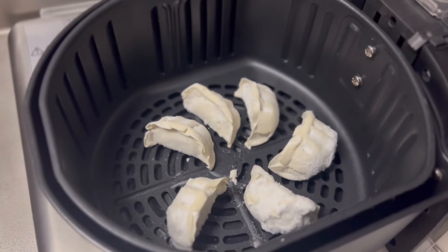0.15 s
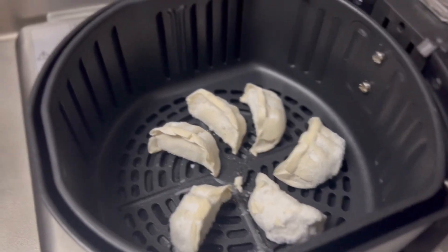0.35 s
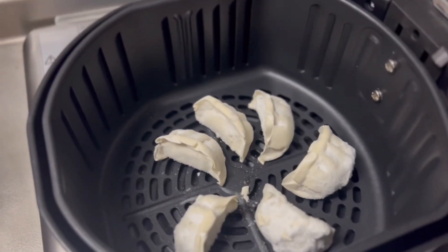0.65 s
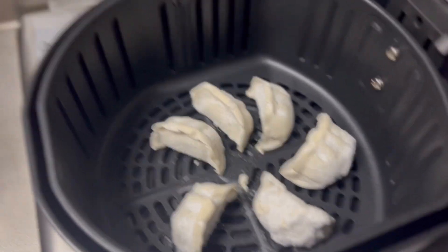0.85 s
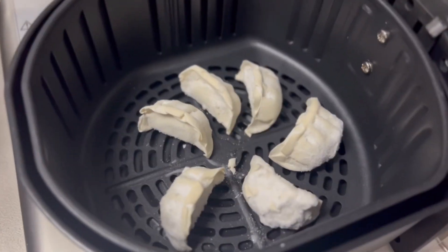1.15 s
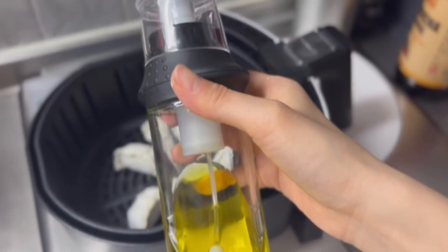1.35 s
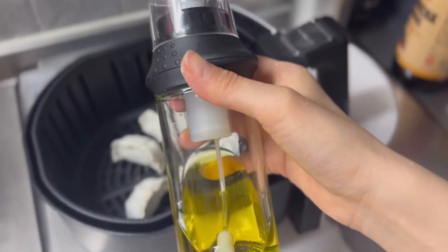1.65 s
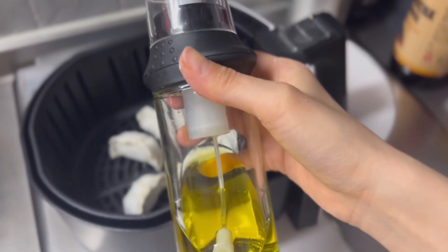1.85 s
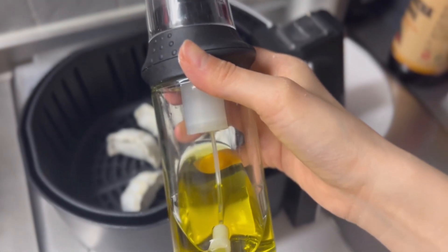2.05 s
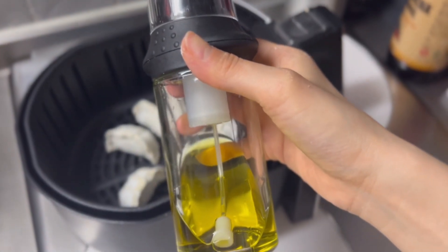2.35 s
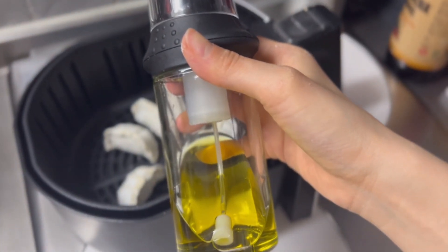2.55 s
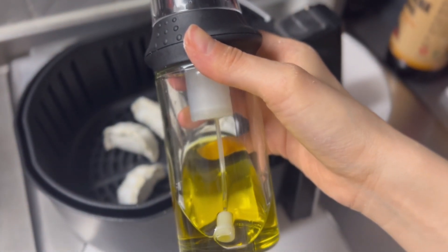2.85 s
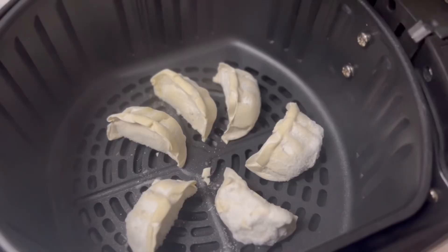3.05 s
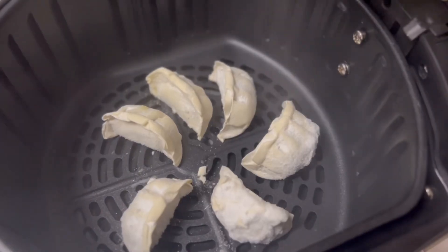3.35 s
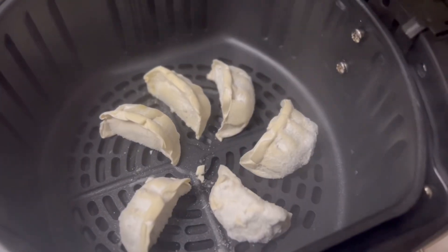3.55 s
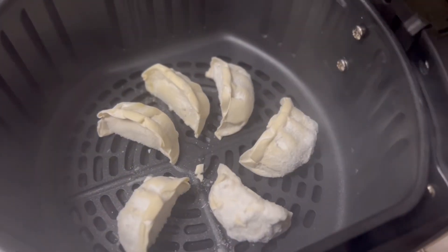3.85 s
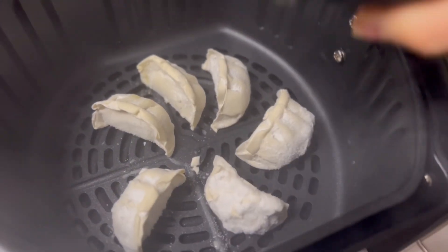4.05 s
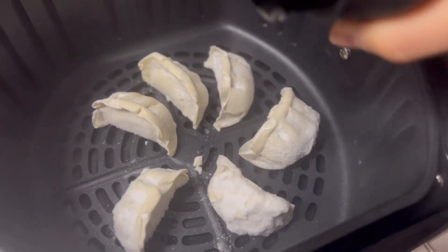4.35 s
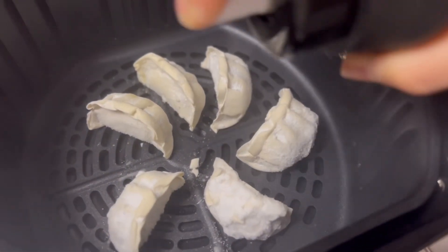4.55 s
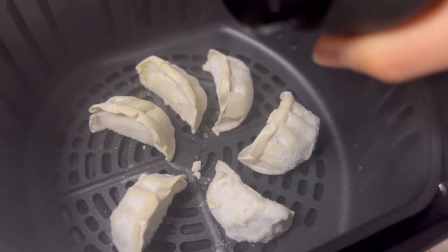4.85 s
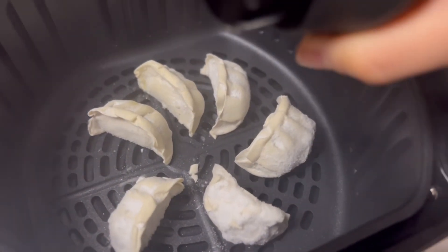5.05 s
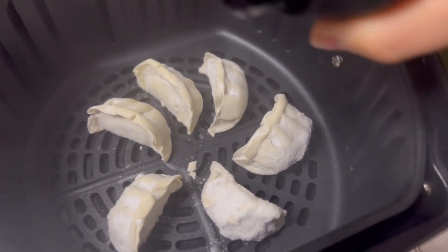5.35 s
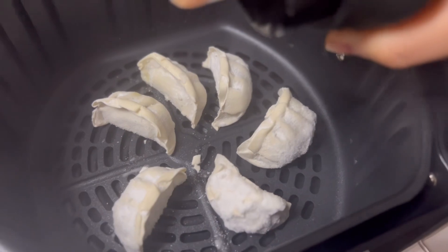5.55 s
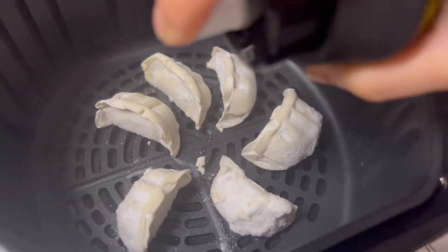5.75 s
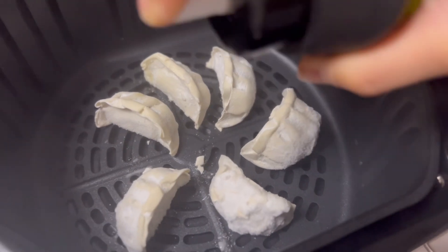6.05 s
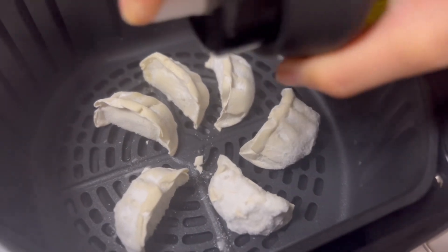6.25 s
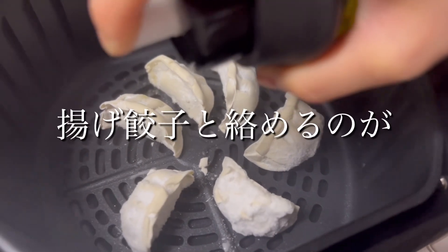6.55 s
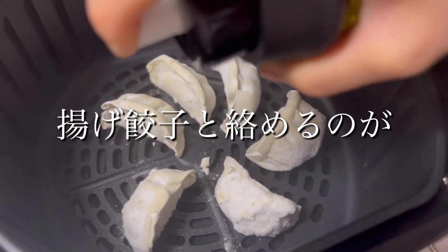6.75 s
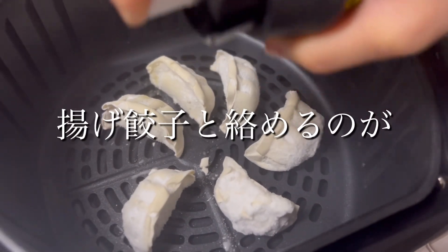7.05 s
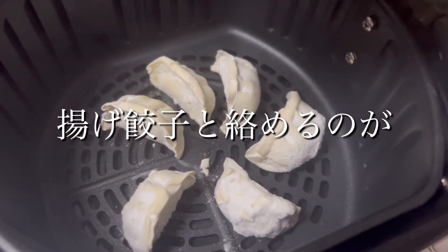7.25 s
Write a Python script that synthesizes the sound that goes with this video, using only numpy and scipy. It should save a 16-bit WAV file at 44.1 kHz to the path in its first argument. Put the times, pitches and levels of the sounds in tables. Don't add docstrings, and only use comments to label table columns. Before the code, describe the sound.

Close stereo phone pickup beside a kitchen counter: constant soft motor rumble and faint air hiss. First comes a quick cluster of hollow, boomy rattles and one heavy clunk from an air fryer basket. Then nearly nothing but hum and a barely audible finger rustle. Three sustained oil-mist sprays follow, bright and breathy with basket echoes, a glassy knock interrupting the last, then a brief rough drag.

```python
import sys
import numpy as np
from scipy import signal
from scipy.fft import rfft, irfft
from scipy.io import wavfile
from scipy.ndimage import uniform_filter1d, minimum_filter1d

SR = 44100
rng = np.random.default_rng(int(sys.argv[2]) if len(sys.argv) > 2 else 0)


def put_to_file(sound):
    columns = np.atleast_2d(sound).T
    safe = np.clip(columns, -1, 1)
    whole_steps = np.round(safe * 32767)
    wavfile.write(sys.argv[1], SR, whole_steps.astype(np.int16))


def level_to_linear(level):
    exponent = np.asarray(level, float) / 20
    return 10 ** exponent


N = 326984

# pitch_hz, level_db, t60_s (time to fade by 60 dB)
BODY = [(93.7, -1, 0.12), (158, 2.5, 0.16), (206.6, 0, 0.14), (275.5, -4, 0.23), (384, -5, 0.19),
        (529, -13, 0.18)]


def evened(x):
    return x / np.sqrt(np.mean(abs(x) ** 2) + 1e-20)


def read(points, hz, axis=1):
    table = np.transpose(points)
    return np.interp(np.log(hz + 1), np.log(table[0] + 1), table[axis])


def add(mix, s, sound):
    part = mix[..., round(s * SR):][..., :sound.shape[-1]]
    part += sound[..., :part.shape[-1]]


def field(count, size, patchy_db, flicker_db):
    frames = 4 * count // size + 5
    hz = np.fft.rfftfreq(size, 1 / SR)[:, None]
    frame_s = np.arange(frames) * size / 4 / SR
    a, b, c, d, patch = rng.standard_normal((frames, len(hz), 5)).T
    patch = uniform_filter1d(patch, size=5, axis=0)
    patch = evened(uniform_filter1d(patch, size=20, axis=1))
    sway = level_to_linear(patchy_db * patch + flicker_db * rng.standard_normal(frames))
    return hz, frame_s, (a + 1j * b) * sway, (c + 1j * d) * sway


def wave(z, count):
    size = 2 * z.shape[-2] - 2
    return signal.istft(z, nperseg=size, noverlap=3 * size // 4)[1][..., :count]


def ring(modes, spread=0.18, onset=2.8):
    t = np.arange(SR // 3) / SR
    out = np.zeros(len(t))
    for hz, db, t60 in modes:
        pitch_hz = hz * (1 + spread * rng.uniform(-0.96, 1))
        shape = level_to_linear(db - 60 * t / t60) * (1 - np.exp(-t * hz * onset))
        out += shape * np.sin(2 * np.pi * pitch_hz * t)
    return out


def tone(hz, level_db):
    drift, swell = uniform_filter1d(rng.standard_normal((N // 64 + 1, 2)), size=60, axis=0).T
    slow = lambda v: np.interp(np.arange(N) / 64, np.arange(len(v)), evened(v))
    phase = 2 * np.pi * np.cumsum(hz * (1 + 0.01 * slow(drift))) / SR
    return level_to_linear(level_db + 2.16 * slow(swell)) * np.sin(phase)


def kitchen():
    # start_s, air_hiss_db, difference_rel_db, brightness_db_per_octave,
    # compressor_drone_db
    takes = [
        (0., -69.5, 4, 3.5, -56),
        (.28, -68.5, 5, 0.5, -57),
        (1.35, -70, 4, 0.37, -58.5),
        (3.058, -58, 3, -4, -55.5),
        (4.5, -61.2, 4, -4.5, -54),
        (5.95, -61.6, 0.5, -4, -55.5),
    ]
    # time_s, deep_rumble_db
    sway = [(0., -49.5), (.5, -48.5), (.75, -39), (1.3, -51), (1.75, -48.5), (2.3, -55.5), (2.75, -44.5),
            (3.05, -49), (3.3, -43), (3.7, -40.5), (3.95, -41), (4.3, -37), (4.6, -47), (5.1, -44),
            (5.8, -49.5), (6.5, -44.5), (6.95, -44), (7.41, -44)]
    # pitch_hz, half_width_hz, level_db
    motor = [
        (50, 7, -2.5),
        (166, 9.4, 1.5),
        (371, 39, -0.5),
        (724, 21, 16),
    ]
    # pitch_hz, level_db (per Hz)
    rumble_colour = [(12, -58), (20, -42), (36, -10.5), (59, -3), (107, -14.5), (125, -9), (173, -15.5),
                     (204, -18.5), (323, -25), (358, -18.5), (404, -26.5), (490, -28), (700, -44),
                     (910, -68), (1540, -120)]
    air_colour = [(180, -48.5), (300, -10.5), (361, -8.5), (408, -23), (498, -28.5), (766, -23.5),
                  (866, -16), (1440, -20.5), (4350, -33.5), (11800, -46.5), (15300, -76), (22000, -120)]
    side_colour = [(35, -58), (60, -28.5), (124, -13), (438, -3), (762, -3.5), (889, -5), (1510, -23),
                   (4770, -33.5), (5950, -49), (11800, -37), (15300, -67), (22000, -120)]
    t = np.arange(N) / SR
    s, air_db, diff_db, bright_db, drone_db = np.transpose(takes)
    take = np.searchsorted(s, t, side="right") - 1
    held = lambda column: uniform_filter1d(column[take], size=800)
    sway_db = np.interp(t, *np.transpose(sway))
    swing_db = sway_db - sway_db.mean()
    casing = lambda hz: level_to_linear(sum(db / (1 + ((hz - f) / w) ** 2) for f, w, db in motor))

    hz, _, a, b = field(count=N, size=4096, patchy_db=3.0, flicker_db=0.5)
    colour = casing(hz) * level_to_linear(read(rumble_colour, hz)) / (1 + (38 / (hz + 1)) ** 7)
    rumble = evened(wave(a * colour * (hz < 58), N)) * level_to_linear(sway_db - 1.5)
    hum = evened(wave(a * colour * (hz >= 58) * (hz < 120), N))
    rumble += hum * level_to_linear(-46 + 0.35 * swing_db)
    rumble += evened(wave(b * colour * (hz >= 120), N)) * level_to_linear(held(drone_db) + 2.5)

    hz, frame_s, a, b = field(count=N, size=1024, patchy_db=3.0, flicker_db=-1.9)
    octaves = np.log2(np.maximum(hz, 500) / 500)
    tilt = level_to_linear(np.interp(frame_s, t, held(bright_db)) * octaves)
    air = evened(wave(a * tilt * casing(hz) * level_to_linear(read(air_colour, hz)), N)) * level_to_linear(held(air_db))
    like = 0.23 / (1 + (2500 / (hz + 1)) ** 3)
    mixed = like * a + np.sqrt(1 - like ** 2) * b
    side = evened(wave(mixed * tilt * level_to_linear(read(side_colour, hz)), N)) * level_to_linear(held(air_db + diff_db))

    rumble += tone(49, -47 + 1.3 * swing_db)
    rumble += tone(167, -53 + 2.3 * held(drone_db - drone_db.mean()))
    return np.array([rumble + air, side + level_to_linear(-51.0) * rumble[::-1]])


def scrape(rows):
    # pitch_hz, level_db (per Hz)
    rub_colour = [(47, -30), (80, 0), (166, -2), (368, -14), (607, -28), (703, -17), (1490, -31),
                  (2360, -39), (7450, -42.5), (10900, -66), (11800, -69), (15300, -101), (22000, -120)]
    s, rub_db, boom_db = np.transpose(rows)
    t = np.arange(s[0], s[-1], 1 / SR)
    hz, _, a, _ = field(count=len(t), size=256, patchy_db=-1.5, flicker_db=-0.5)
    rub = evened(wave(a * level_to_linear(read(rub_colour, hz)) * (hz > 700), len(t)))
    boom = evened(signal.fftconvolve(rng.standard_normal(len(t)), ring(BODY))[:len(t)])
    both = rub + boom * level_to_linear(np.interp(t, s, boom_db))
    return s[0], both * level_to_linear(np.interp(t, s, rub_db)) * signal.windows.tukey(len(t), .05)


def rattle(s, crack_db, body_db, treble_db, rise):
    # pitch_hz, level_db, t60_s
    wall = [(873, -2, 0.19), (1200, -9, 0.13), (1716, 15.5, 0.063), (2450, -28, 0.04), (2950, 13.5, 0.067)]
    t = np.arange(SR // 3) / SR
    hz = np.fft.rfftfreq(len(t), 1 / SR)
    wall_db = sum(6 / (1 + (2 * (hz - f * rng.uniform(0.664, 1.2)) / 350) ** 2) for f, _, _ in wall)
    colour = level_to_linear(wall_db) / (1 + (hz / 4800) ** 7)
    colour += level_to_linear(treble_db + 7.0) / (1 + (4500 / (hz + 1)) ** 4) / (1 + (hz / 9500) ** 12)
    noise = evened(irfft(rfft(rng.standard_normal(len(t))) * colour, len(t)))
    grit = evened(uniform_filter1d(rng.standard_normal(len(t)), size=40))
    noise = evened(noise * level_to_linear(4 * grit))
    snap_t60, drag_t60, soft_s = 0.032, 0.28, 0.0053
    t60 = snap_t60 + (drag_t60 - snap_t60) * np.tanh(rise / soft_s)
    shape = level_to_linear(-60 * t / t60) * (1 - np.exp(-t / rise))
    crack = 1.25 * noise * shape / shape.max() + level_to_linear(-20.0) * ring(wall, spread=0.084)
    thud = signal.lfilter(*signal.butter(2, [150, 1100], "band", fs=SR), rng.standard_normal(len(t)))
    thud = 0.33 * evened(thud) * level_to_linear(-60 * t / 0.15) * np.minimum(t / 0.003, 1)
    return s, level_to_linear(crack_db - 9.0) * crack + level_to_linear(body_db - 5.0) * (ring(BODY, spread=0.1184) + thud)


def basket_handling():
    # time_s, scrape_db, boom_rel_db
    drags = [
        [(0.66, -65, 12), (0.788, -82, 5), (0.886, -83, 29), (1.02, -44, -16), (1.066, -56, -9),
         (1.228, -67, 4), (1.33, -90, -6)],
        [(7.325, -64, 4.5), (7.355, -50.5, 2), (7.385, -48, 7.5), (7.42, -45, 0)],
    ]
    # start_s, crack_db, body_db, treble_rel_db, rise_s
    blows = [(0.6955, -50, -41, 7, 0.004), (0.707, -63, -39, -4, .003), (0.823, -42.5, -51, -34, 0.021),
             (0.8382, -23, -26, -49, 0.00087), (0.9445, -39, -29, -25, 0.003), (.955, -40, -25, -29, .002),
             (0.9661, -25, -27, -19, 0.00078), (1.002, -29, -28, -11, 0.0024),
             (1.034, -33, -22, -22, 0.00053), (1.0875, -45, -40, -5, .002), (1.112, -42, -29.5, -7, 0.0047),
             (1.121, -35, -29, -3, 0.002), (1.1305, -29, -35, 0, .001), (1.134, -27, -26, 0, 0.00075),
             (1.189, -39.5, -32, 8, 0.0011), (1.323, -57, -55, -5, 0.00046), (7.356, -44, -35, -13, 0.0089)]
    # start_s, level_db, swell_quickness (no unit)
    clunks = [
        (0.706, -28.5, 2.1),
        (0.8396, -26.5, 1.6),
        (.967, -23, 0.72),
        (1.0017, -10, 0.55),
        (1.035, -20, 1.1),
        (1.133, -24, 0.59),
    ]
    # pitch_hz, level_db, t60_s
    spots = [
        [(104, -0.5, .25), (169, 3.5, 0.1), (275, -4.5, 0.09), (560, -22, 0.056)],
        [(92.4, -2.5, 0.6), (200, 9.5, 0.047), (322, -3.5, .09), (462, 6, 0.042), (770, -4, 0.035),
         (936, -4, 0.094), (1927, -11, 0.057), (2470, -5, .05), (3200, -13, .04)],
        [(100, 3.5, .2), (155.2, 3.5, 0.28), (196, 2, 0.13), (237, -2, 0.14), (525, 1, 0.045),
         (747, -1.5, 0.052), (1385, -1, 0.04), (1525, -10, 0.048)],
        [(49, -1.5, 0.2), (102.4, -8, 0.19), (159, -1, 0.11), (195.5, 3, 0.085), (211.7, -2, 0.095),
         (279, -10, 0.24), (345, -10, .1), (566, -21, 0.13), (710, -22, .1)],
        [(200, 3, 0.076), (330, -4, 0.076), (567, -20, 0.042)],
        [(200.5, 4, 0.1), (291, 2.5, 0.17), (443, -2, 0.061), (668, -3.5, 0.087), (825, 2.5, 0.079),
         (926, -6, 0.13)],
    ]
    out = np.zeros(N)
    for rows in drags:
        add(out, *scrape(rows))
    for row in blows:
        add(out, *rattle(*row))
    for (s, db, quick), modes in zip(clunks, spots):
        add(out, s, level_to_linear(db) * ring(modes, spread=0, onset=quick))
    return out


def rustle():
    # centre_s, spread_s, pitch_hz, spread_hz, level_db
    shift = (2.39, .07, 4400, 900, -80)
    s, spread_s, hz0, spread_hz, db = shift
    hz, _, a, _ = field(count=N, size=256, patchy_db=7.0, flicker_db=-2.0)
    hiss = evened(wave(a * np.exp(-((hz - hz0) / spread_hz) ** 2), N))
    return level_to_linear(db) * hiss * np.exp(-((np.arange(N) / SR - s) / spread_s) ** 2)


def spray(valve, hand, total, diff, tops_db, basket):
    # pitch_hz, width_hz, level_db
    cavity = [
        (960, 60, 4),
        (1200, 55, 9),
    ]
    # pitch_hz, likeness (0-1), phase_rad
    link = [(400, 0.1, 0.15), (888, 1, 0.66), (2880, 0.8, 0.22), (6400, 1, 0.46), (8600, 0.3, -1.34),
            (10580, 0.4, -0.48), (11670, 0.05, 1.4)]
    # pitch_hz, level_db
    sum_top = [(8800, -4), (9400, -6), (9620, -7.5), (9800, -20), (10400, -20.5), (10650, -6.5),
               (11200, -2.5), (11800, -4.5)]
    opens, shut, seep, fizz_db, thin_db = valve
    s, pressure_db, reach = np.transpose(hand)
    t = np.arange(opens - seep, shut, 1 / SR)

    early = np.maximum(opens - t, 0)
    lost_db = 13.5 * np.minimum(early / 0.0081, 1) + 212 * early
    lost_db += 38 * np.clip(1 + (t - shut) / 0.032, 0, 1) ** 2.1

    hz, frame_s, a, b = field(count=len(t), size=1024, patchy_db=1.3, flicker_db=0.92)
    inside = np.interp(frame_s + t[0], s, reach)
    shake = .008 * evened(uniform_filter1d(rng.standard_normal(len(inside)), size=20))
    slide = 1 - 0.017 * (1.3 - inside) + shake
    echo_out, echo_in = 0.39, 1.07
    echoes_db = sum(db / (1 + (2 * (hz - f * slide) / w) ** 2) for f, w, db in basket)
    echoes_db *= echo_out + (echo_in - echo_out) * inside
    echoes_db += sum(db / (1 + (2 * (hz - f) / w) ** 2) for f, w, db in cavity)

    body_db = thin_db * (np.median(inside) - inside) + 0.556 * np.interp(frame_s + t[0], t, lost_db)
    tilt_db = np.minimum(body_db, 14) / (1 + (hz / 2500) ** 4)
    tilt_db += (fizz_db - 15 * inside) / (1 + (8500 / (hz + 1)) ** 8)

    like = np.clip(read(link, hz), 0, 1)
    other = like * np.exp(1j * read(link, hz, axis=2)) * a + np.sqrt(1 - like ** 2) * b
    top_db, lift_db, depth = tops_db
    diff_db = read(diff, hz) + top_db
    sum_db = np.where(hz < 8800, read(total, hz), diff_db + depth * read(sum_top, hz) + lift_db)
    pair = np.array([a * level_to_linear(sum_db), other * level_to_linear(diff_db)]) * level_to_linear(echoes_db)
    scale = np.sqrt(np.mean(wave(pair[0] * (hz > 2500) * (hz < 8000), len(t)) ** 2))
    jet = wave(pair * level_to_linear(tilt_db), len(t)) / scale
    strength = level_to_linear(np.interp(t, s, pressure_db) - lost_db)
    return t[0], jet * strength * signal.windows.tukey(len(t), .004)


def three_jets():
    # opens_s, shut_s, seep_before_s, fizz_db, body_thinning_db (per unit of reach)
    valves = [
        (3.059, 3.868, 0.001, 3.5, 7),
        (4.071, 5.239, .02, 8.5, 15),
        (5.649, 7.157, .149, 14.5, 6.5),
    ]
    # time_s, pressure_db, reach_into_basket (0-1)
    hands = [
        [(3.06, -37, 0.92), (3.25, -40, 0.46), (3.55, -39, 0.4), (3.83, -37, 0.72)],
        [(4.07, -34, 1), (4.1, -37.5, 0), (4.22, -40, 0.02), (4.35, -38.5, 0.23), (4.78, -38, 0.19),
         (4.91, -35.5, 0.52), (5.21, -35.5, 0.79)],
        [(5.65, -38, 0.19), (5.8, -38.5, 0.), (6.05, -38, 0.43), (6.22, -38, 0.44), (6.5, -36, 0.84),
         (6.9, -37, 1), (7.12, -38, 1)],
    ]
    # pitch_hz, level_db (per Hz)
    sums = [
        [(240, -11), (400, -16.5), (532, -17), (964, -4), (1100, -8), (1190, -4.5), (1520, -12), (2320, -4),
         (2780, -9), (4490, -11), (5180, -7.5), (8800, -2), (11400, -36), (19400, -120)],
        [(240, -47), (400, -13), (1000, -3.5), (1190, -9.5), (1700, -8), (3130, -4), (3470, -1), (4100, -7),
         (5450, -2), (6130, -3.5), (6970, 0), (8800, 0.5), (11400, -33), (19400, -120)],
        [(240, -30), (400, -46), (473, -24.5), (518, -24.5), (689, -24.5), (1720, -24.5), (2350, -21.5),
         (3090, -17.5), (3650, -17), (5180, -11), (6050, -10.5), (8800, -12.5), (11400, -43), (19400, -120)],
    ]
    # pitch_hz, level_db (per Hz)
    diffs = [
        [(240, -59), (400, -44), (568, -17), (842, -11), (1180, -11), (1700, -16.5), (2450, -5), (2940, -23),
         (3250, -8), (4490, -15.5), (5020, -6.5), (7540, -9.5), (11500, 4), (15000, -51), (22000, -120)],
        [(240, -44.5), (400, -42), (467, -14.5), (1030, -9.5), (1180, -12), (1420, -12.5), (3160, -6),
         (3530, -8), (4120, -11), (5460, -3.5), (7980, -7.5), (9450, 1), (11500, 1.5), (15000, -33),
         (22000, -120)],
        [(240, -58), (400, -53.5), (522, -37), (692, -23.5), (1990, -25.5), (2320, -19.5), (3110, -16),
         (3680, -20.5), (5240, -9.5), (6020, -13), (7980, -15), (10600, -12.5), (11500, -12), (15000, -21),
         (22000, -120)],
    ]
    # difference_level_db, sum_lift_above_8800_hz_db, depth_of_top_dip (0-1)
    tops = [
        (2.2, -0.5, 1.),
        (3.16, -1.5, 1.),
        (0.2, -10.5, .4),
    ]
    # pitch_hz, width_hz, level_db
    echoes = [
        [(1275, 190, -0.5), (2390, 300, -1.5), (2780, 130, -7), (4330, 160, -5), (5250, 83, 7.5),
         (6520, 89, -9.5), (9260, 190, 1.5)],
        [(1212, 170, 6.5), (3640, 89, 5.5), (3910, 78, -9), (5800, 140, 3), (6220, 76, -12), (6820, 1000, 4.5),
         (7980, 220, -10)],
        [(3280, 460, 4), (3550, 37, -15), (5620, 150, -6), (6070, 150, -27.5), (6780, 83, 2.5),
         (7410, 170, 6.5), (7990, 490, -12.5), (9080, 160, -9)],
    ]
    jets = np.zeros((2, N))
    for parts in zip(valves, hands, sums, diffs, tops, echoes):
        add(jets, *spray(*parts))
    return jets


def knock():
    # start_s, crack_db, body_db, treble_rel_db, rise_s
    brush = [
        (6.205, -31, -39, 3, 0.022),
        (6.2301, -29, -49, -5, 0.0021),
    ]
    # pitch_hz, level_db, t60_s
    tick = [(2570, -27, 0.026), (3110, -16, 0.015), (3380, -19.5, 0.016), (4400, -23.5, 0.017),
            (5080, -24.5, 0.031)]
    # pitch_hz, level_db, t60_s, delay_s
    swells = [(66.5, -8, 0.12, 0.0065), (201, -6.5, 0.043, 0.002), (294, -18.5, 0.06, 0.0025),
              (353, -15, 0.036, 0.0146), (521, -18, 0.15, 0.0021), (596, -22.5, 0.069, 0.00295),
              (666, -29.5, 0.045, 0.0027), (100, -14, 0.102, 0.0061), (448, -26, 0.049, 0.0049),
              (1733, -24.5, 0.054, 0.0043), (1960, -27, 0.054, 0.00112), (1150, -31, 0.044, 0.00058)]
    # start_s, then tones as pitch_hz, level_db, t60_s
    bounce = (6.2426, [(156, 0, 0.026)])
    hit_s = 6.2318
    out = np.zeros(N)
    for row in brush:
        add(out, *rattle(*row))
    add(out, hit_s, ring(tick, spread=0))
    for hz, db, t60, delay in swells:
        add(out, hit_s + delay, ring([(hz, db, t60)], spread=0, onset=.7))
    add(out, bounce[0], -ring(bounce[1], spread=0, onset=5.2))
    return out


def room(x):
    # pitch_hz, t60_s
    fading = [(300, 0.21), (1500, 0.25), (5000, 0.25), (8000, 0.19), (11000, 0.17)]
    taps = np.zeros((2, SR // 2))
    at = np.arange(200, SR // 2 - 20, 20)
    taps[:, at] = rng.choice([-1., 1.], (2, len(at)))
    taps = np.array([np.roll(row, rng.integers(200)) for row in taps])
    taps += rng.standard_normal(taps.shape)
    hz, t, z = signal.stft(taps, SR, nperseg=256)
    tail = signal.istft(z * level_to_linear(-60 * t / read(fading, hz)[:, None]), SR, nperseg=256)[1]
    return signal.fftconvolve(x, tail / np.linalg.norm(tail[0]), axes=1)[:, :N]


def scene():
    # start_s, then tones as pitch_hz, level_db, t60_s
    rim_side = (6.2355, [(532, -24, 0.12), (150, -39, 0.089)])
    background = kitchen()
    basket = basket_handling()
    fingers = rustle()
    jets = three_jets()
    blow = knock()
    treble = signal.butter(2, 330, "high", fs=SR)
    side = signal.lfilter(*treble, level_to_linear(-9.5) * basket + level_to_linear(-2.5) * blow)
    hits = np.array([basket + blow, side])
    add(hits[1], rim_side[0], ring(rim_side[1], spread=0, onset=.7))
    mix = jets + level_to_linear(-12) * room(jets) + hits + level_to_linear(-10.0) * room(hits)
    total, diff = mix + background + fingers
    return np.array([total + diff, total - diff])


def thinned(pair):
    # pitch_hz, margin_db, chance_db
    mask = [(402, 25, -4), (1180, 17, -0.5), (3100, 10.5, 6), (6000, 9, 4.5), (8500, 8, 3.5),
            (9500, 11, 5.5), (10600, 11, 6.5), (11370, 8, 5)]
    # time_s, chance_factor (no unit), spare_margin_db
    thrift = [
        (0., .7, 7),
        (4.3, .8, 4),
        (5.2, 1.3, 0),
        (7.41, 1.3, 0),
    ]
    # pitch_hz, margin_db
    memory = [
        (600, 76),
        (7600, 70),
        (8800, 60),
        (11500, 58),
    ]
    hz, block_s, z = signal.stft(pair, SR, window="cosine", nperseg=2048, noverlap=1024)
    band = np.searchsorted(np.r_[np.geomspace(400, 7500, 64), np.arange(7800, 12000, 300)], hz)
    starts = np.flatnonzero(np.diff(band, prepend=-1))
    low_hz = hz[starts]
    power = np.add.reduceat(abs(z) ** 2, starts, axis=1) / np.diff(starts, append=len(hz))[:, None]
    level_db = 10 * np.log10(uniform_filter1d(power, size=2, axis=2) + 1e-20)
    near_db = -minimum_filter1d(-level_db.max(0), size=9, axis=0)

    s, chance, spare_db = np.transpose(thrift)
    limit_db = near_db - read(mask, low_hz)[:, None]
    limit_db -= (low_hz[:, None] < 8000) * np.interp(block_s, s, spare_db)
    luck = uniform_filter1d(rng.standard_normal(level_db.shape), size=2, axis=2)
    luck *= np.where(low_hz[:, None] < 5000, np.interp(block_s, s, chance), 1)
    treble_db = 10 * np.log10(power[:, low_hz > 3000].sum((0, 1)) + 1e-20)
    recent_db = 10 * np.log10(uniform_filter1d(level_to_linear(2 * treble_db), size=31, origin=15) + 1e-20)
    limit_db = np.maximum(limit_db, recent_db - read(memory, low_hz)[:, None])
    keep = level_db + luck * read(mask, low_hz, axis=2)[:, None] > limit_db

    well_fed = (recent_db - treble_db < 16) | (low_hz[:, None] > 3000) | (block_s < thrift[2][0])
    keep &= well_fed | (uniform_filter1d(luck[0], size=2, axis=0) > -.35)
    attack = np.diff(treble_db, prepend=0) > 25
    keep[..., attack] = keep[:, 0] = True
    wobble = uniform_filter1d(rng.standard_normal(z.shape[2]), size=3)
    edge = hz[:, None] < 11650 + 400 * attack + 200 * wobble
    z = z * keep[:, np.cumsum(np.diff(band, prepend=band[0]) > 0)] * edge
    return signal.istft(z, SR, window="cosine", nperseg=2048, noverlap=1024)[1][:, :N]


def band_limit(x):
    return signal.sosfilt(signal.butter(12, 13110, fs=SR, output="sos"), x)


def record(dry):
    total, diff = thinned(np.array([dry[0] + dry[1], dry[0] - dry[1]]) / 2)
    return band_limit(np.array([total + diff, total - diff]))


dry = scene()
out = record(dry)
put_to_file(out)
```